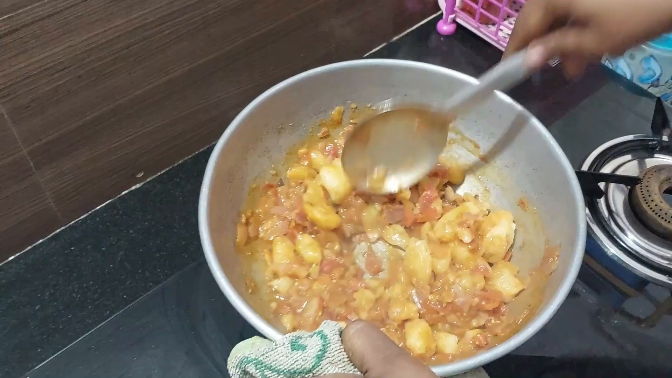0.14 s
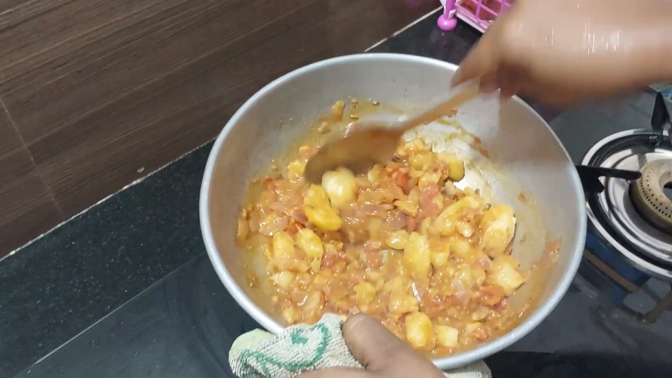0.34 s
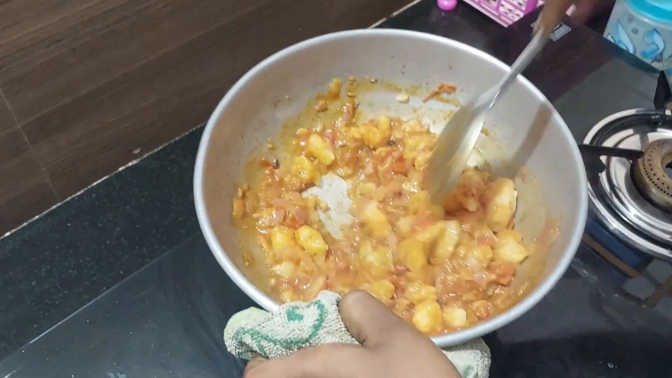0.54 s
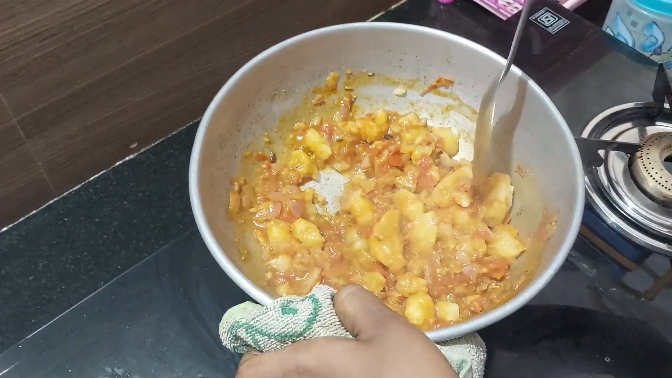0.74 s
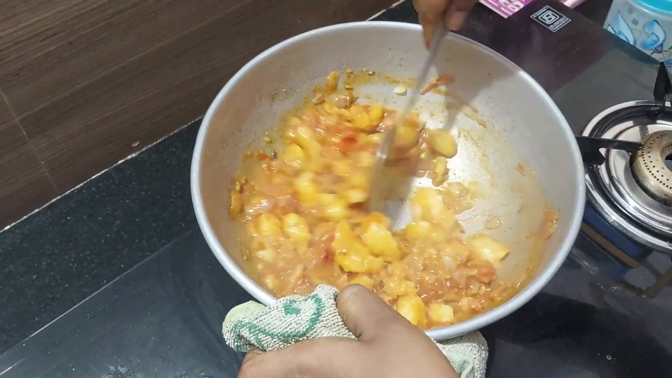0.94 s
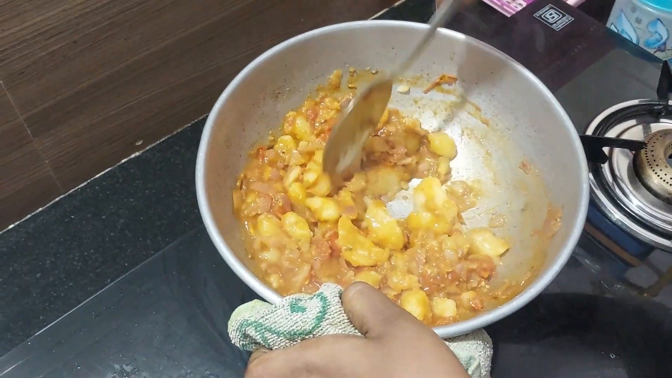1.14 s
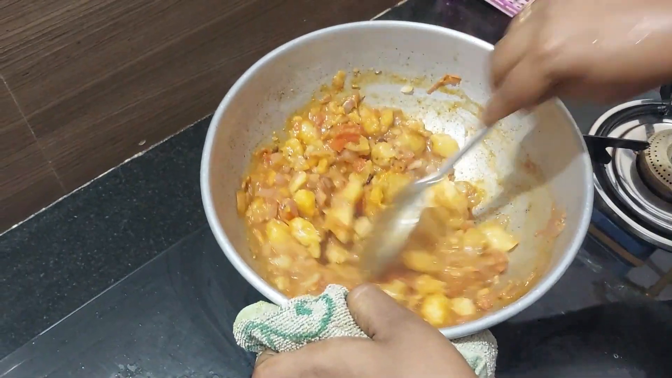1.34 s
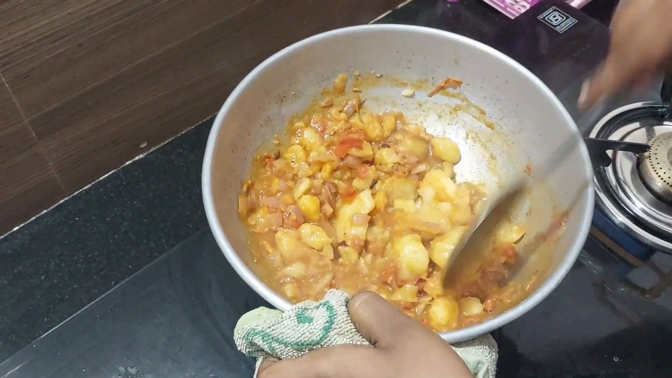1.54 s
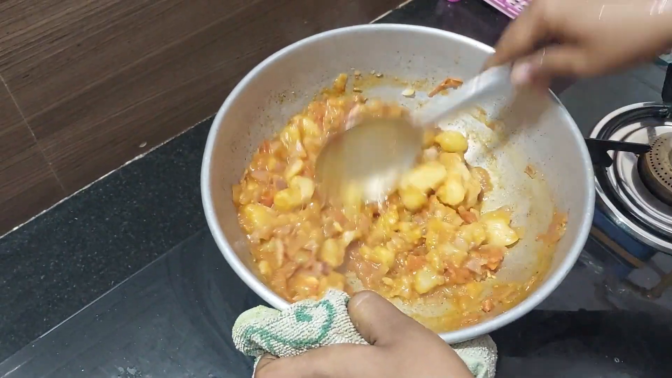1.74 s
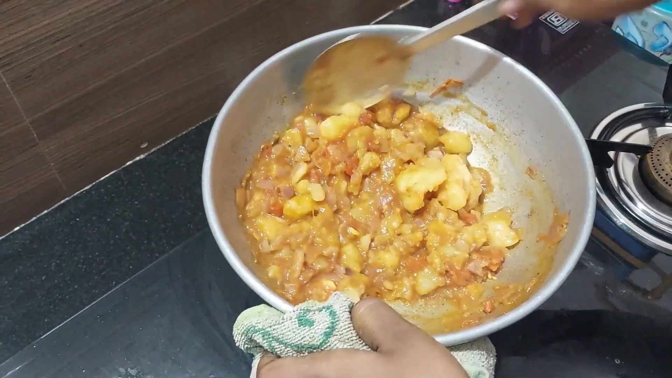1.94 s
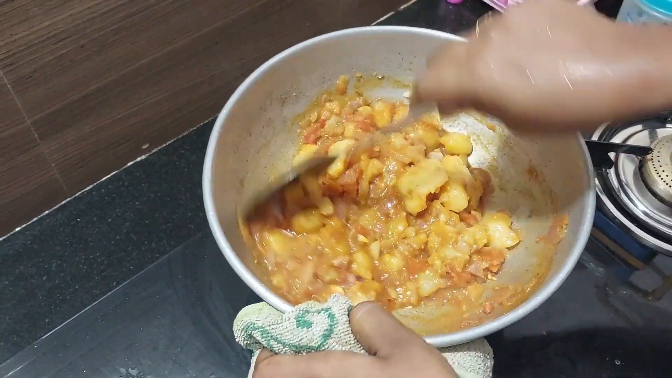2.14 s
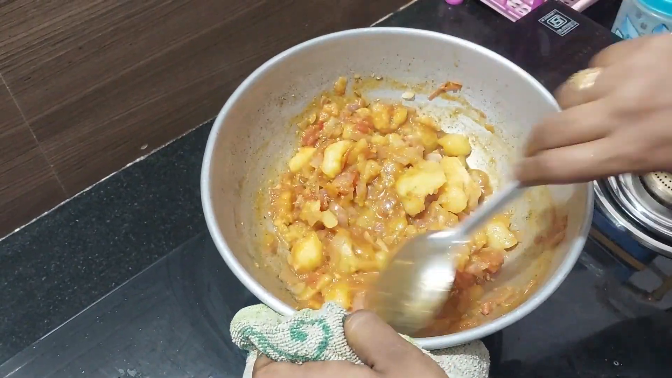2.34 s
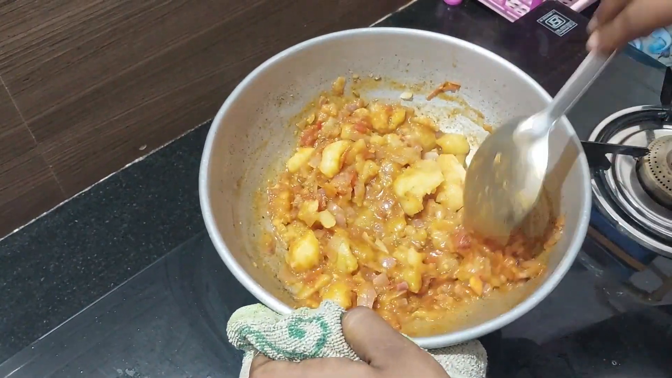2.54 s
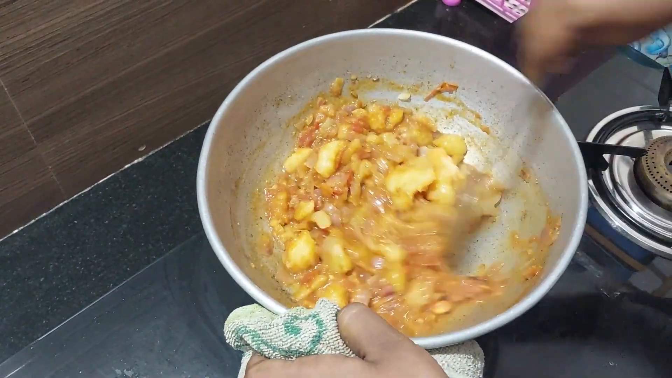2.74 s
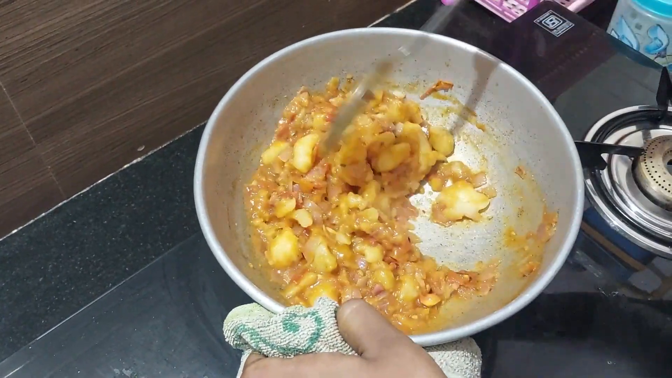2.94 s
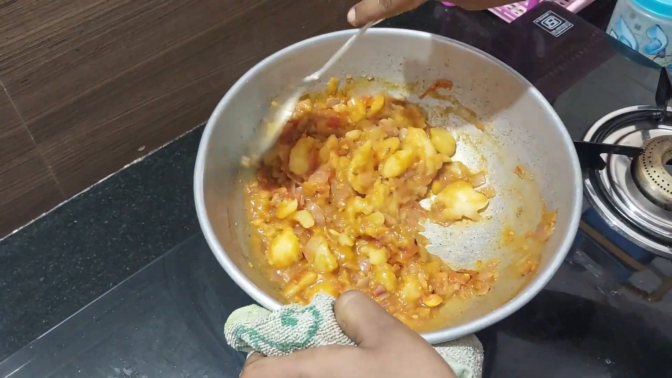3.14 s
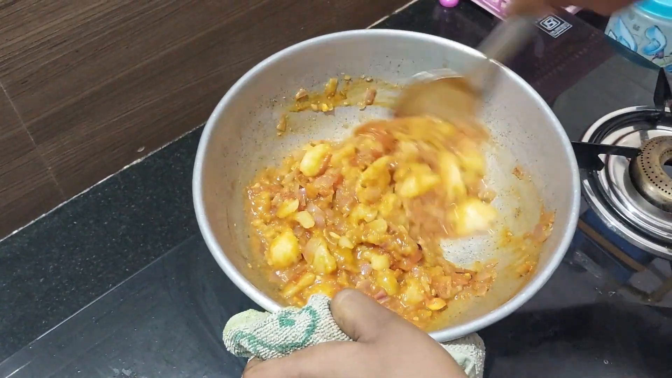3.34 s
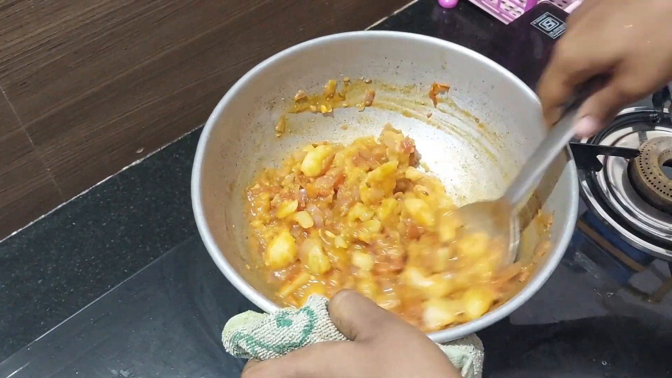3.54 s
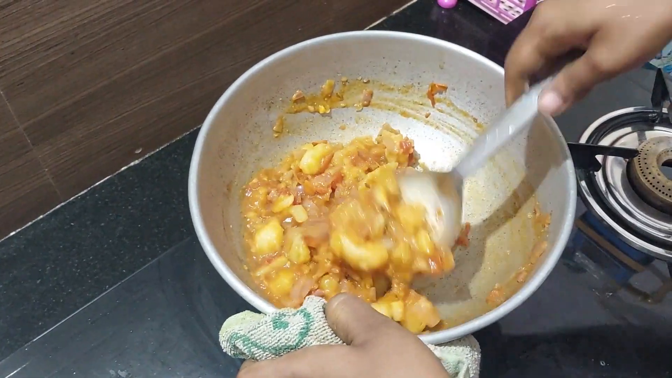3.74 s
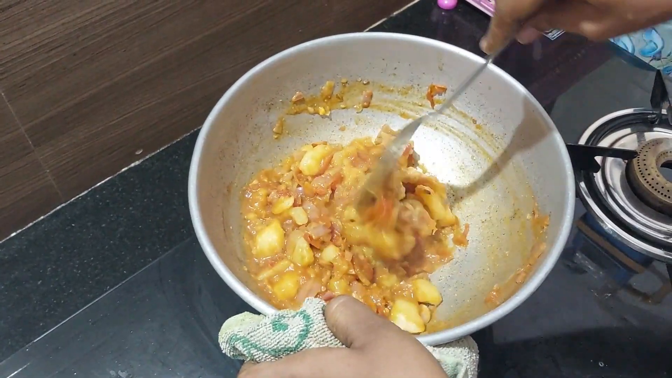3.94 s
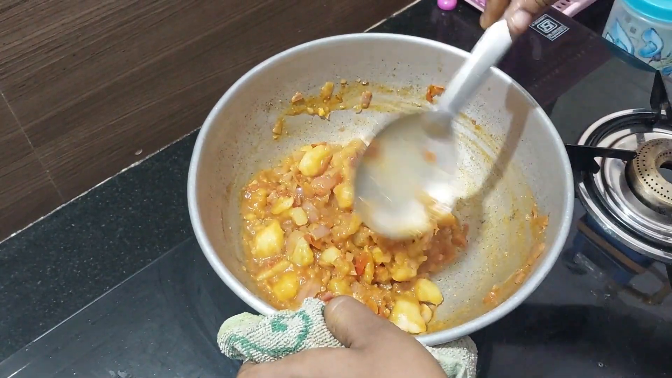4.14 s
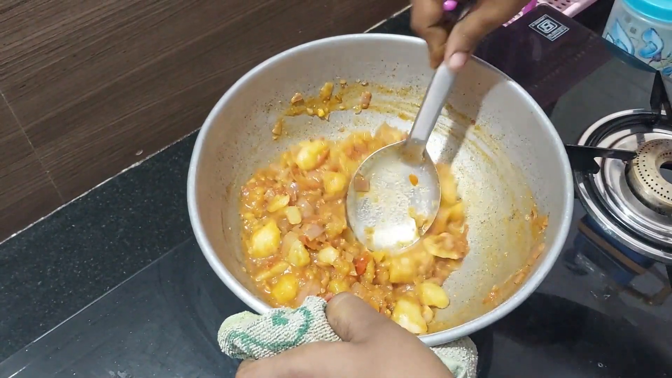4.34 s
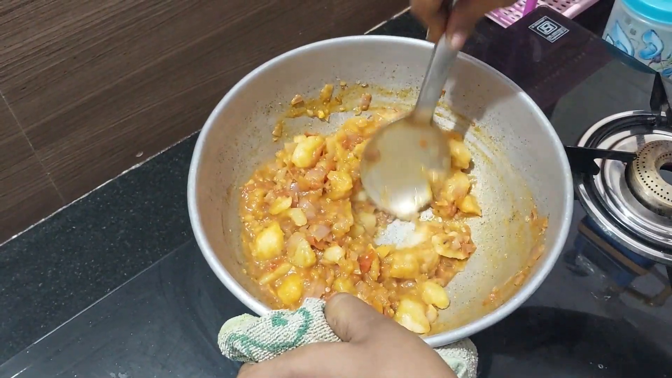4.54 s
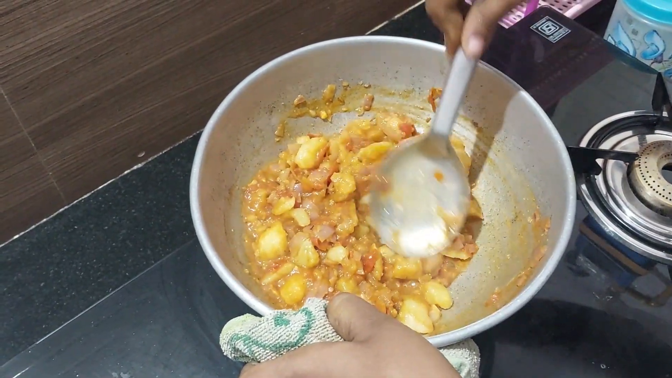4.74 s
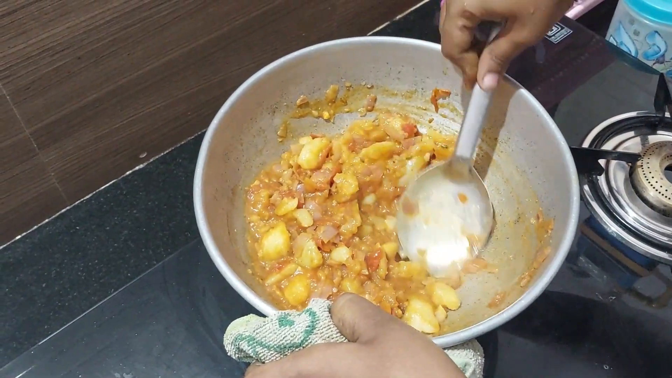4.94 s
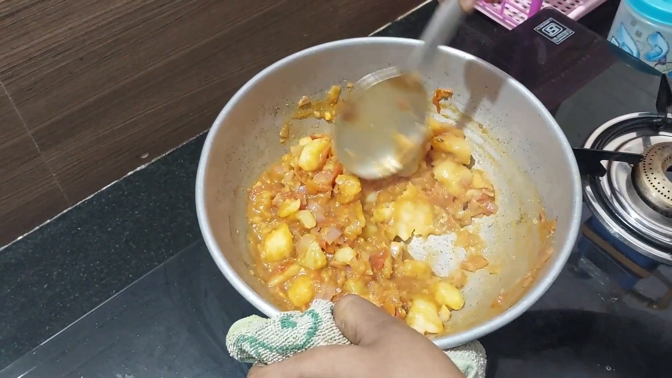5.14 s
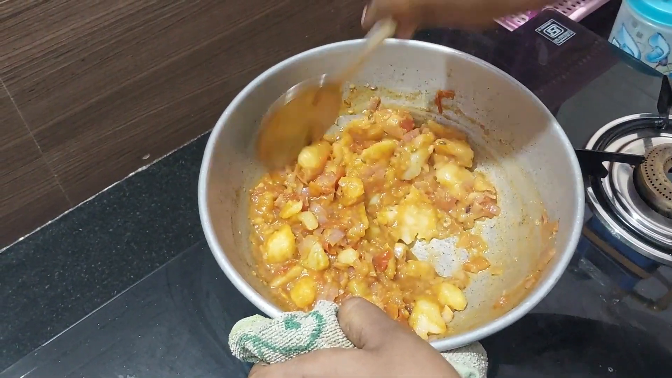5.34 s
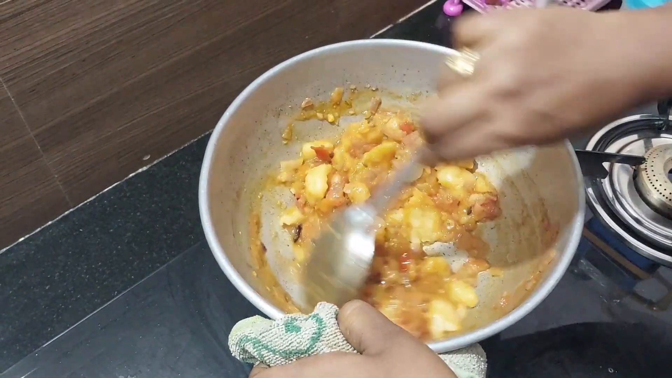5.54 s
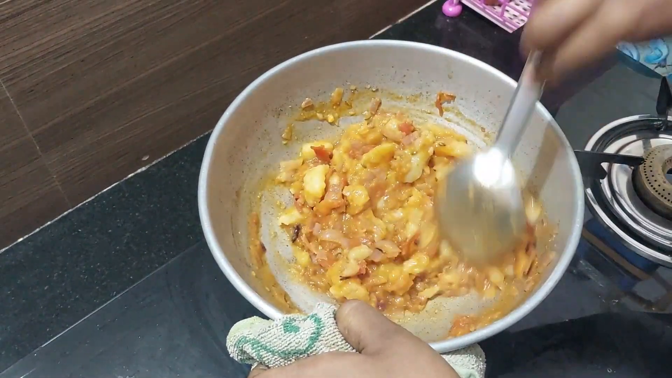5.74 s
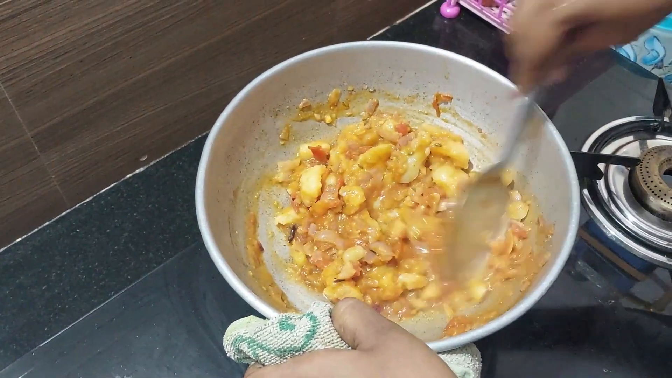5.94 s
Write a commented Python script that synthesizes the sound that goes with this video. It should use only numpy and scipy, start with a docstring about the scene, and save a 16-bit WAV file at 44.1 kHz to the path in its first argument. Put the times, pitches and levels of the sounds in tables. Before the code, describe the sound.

Thick gravy is stirred on a stove, with ringing spoon scrapes, dull knocks on the pan and quiet wet sizzling.

```python
"""Stirring gravy in a metal pan

A steel spoon stirs thick potato gravy on a stove. As it scrapes, it moves between ringing on the
pan's bare wall and chattering over the bottom; it knocks the pan, bare or cushioned by food.
The gravy squelches and sizzles, the hand-held pan rumbles on its support, and the hard-walled
kitchen rings on."""
import sys
import numpy as np
from scipy import signal
from scipy.fft import rfft, irfft, next_fast_len
from scipy.io import wavfile
from scipy.ndimage import map_coordinates

SR = 44100
rng = np.random.default_rng(int(sys.argv[2]) if len(sys.argv) > 2 else 0)


def int16_out(signal):
    """Quantize to a 16-bit WAV file."""
    q = np.round(np.clip(np.atleast_2d(signal).T, -1, 1) * 32767)
    wavfile.write(sys.argv[1], SR, q.astype(np.int16))


N = 268392


def amp(db):
    """Decibels to gain."""
    return 10 ** (np.asarray(db) / 20)


def unit(x):
    """Scale to rms 1."""
    return x / np.sqrt(np.mean(np.abs(x) ** 2) + 1e-20)


def along(points, hz):
    """Read (frequency, value) points on a log axis."""
    f, values = np.transpose(points)
    return np.interp(np.log(hz + 1), np.log(f), values)


def curves(rows):
    """Breakpoints to automation: one curve for each column after the time."""
    times, *columns = np.transpose(rows)
    return [np.interp(np.arange(N) / SR, times, column) for column in columns]


def wobble(rate):
    """A smooth random curve, rate knots a second."""
    return map_coordinates(rng.standard_normal(int(N * rate / SR) + 4), [np.arange(N) * rate / SR])


def filtered(x, response):
    """Pass x through a frequency response."""
    n = x.shape[-1]
    size = next_fast_len(n + SR // 8, real=True)
    return irfft(rfft(x, size) * response(np.fft.rfftfreq(size, 1 / SR)), size)[..., :n]


def coloured(x, spectrum):
    """Shape x with an EQ curve, at rms 1."""
    return unit(filtered(x, lambda hz: amp(along(spectrum, hz))))


def body(modes, f):
    """Causal response of a set of modes; each level sets that mode's total power."""
    return sum((-1) ** k * amp(db) / np.sqrt(width) * 1j * f * width / (hz * hz - f * f + 1j * f * width)
               for k, (hz, width, db) in enumerate(modes))


def band(f, centre_hz, q):
    """One broad causal resonance."""
    return 1 / (1 + 1j * q * (f / centre_hz - centre_hz / (f + .001)))


def slips(rate, spread_db):
    """Tiny impulses at random moments with scattered sizes, at rms 1."""
    size = amp(spread_db * np.clip(rng.standard_normal(N), -2, 2))
    return unit((rng.random(N) < rate / SR) * size * np.sign(rng.standard_normal(N)))


def burst(t60, response):
    """A dying cluster of contacts through a resonance, with the energy of 40 ms at rms 1."""
    t = np.arange(SR // 5) / SR
    hit = filtered(rng.standard_normal(len(t)) * amp(-60 * t / t60), response)
    return hit / np.linalg.norm(hit) * np.sqrt(.04 * SR)


def envelope(start, hold, attack_s=0.0071, sag_db_per_s=17, release_db_per_s=171):
    """A quick rise, a sagging hold and a release."""
    t = np.maximum(np.arange(N) / SR - start, 0)
    fall_db = sag_db_per_s * t + release_db_per_s * np.maximum(t - hold, 0)
    return np.minimum(t / attack_s, 1) * amp(-fall_db)


def add(track, start, sound):
    """Mix a sound in at start seconds."""
    part = track[round(start * SR):][:len(sound)]
    part += sound[:len(part)]


# Stereo width: (frequency [Hz], side minus mid [dB])
STEREO_WIDTH = [(60, -13), (250, -10), (500, -8.5), (1000, 0), (2000, 1.5), (4000, 0), (12000, 2.5)]
def spread(mid, side):
    """Left and right: the bass is nearly mono, the treble wide."""
    side = filtered(side, lambda hz: amp(along(STEREO_WIDTH, hz)))
    return np.array([mid + side, mid - side])


# Room tone EQ: (frequency [Hz], level [dB])
ROOM_TONE_EQ = [(15, -31.5), (25, -8), (117, 9), (200, -6), (285, 0.5), (373, -11.5), (531, -8.5),
                (1440, -20.5), (7310, -25.5), (8830, -36), (12200, -32.5), (16000, -48)]
def room_tone():
    """The steady bed of the kitchen and the burner."""
    return amp(-54) * spread(*coloured(rng.standard_normal((2, N)), ROOM_TONE_EQ))


# Reverb decay: (frequency [Hz], t60 [s])
KITCHEN_DECAY = [(150, 0.59), (500, 0.51), (1200, 0.46), (3000, 0.43), (7000, 0.36), (15000, 0.32)]
def kitchen(x):
    """The hard walls answer; their echo pattern keeps changing as the spoon moves."""
    echo, hop = np.zeros((2, N)), SR // 5
    padded = np.pad(x, (hop, 2 * hop))
    fade = np.sin(np.pi * np.arange(2 * hop) / (2 * hop))
    hz, t = np.fft.rfftfreq(256, 1 / SR), np.arange(0, SR // 2, 128) / SR
    mid_side_gain = np.array([np.ones(len(hz)), amp(along(STEREO_WIDTH, hz))])
    decay = amp(-60 * t / along(KITCHEN_DECAY, hz)[:, None]) * mid_side_gain[..., None]
    noise = signal.stft(rng.standard_normal((2, N + SR)), SR, nperseg=256)[2]
    for start in range(0, N + hop, hop):  # each overlapping slice gets its own random tail
        offset = rng.integers(noise.shape[-1] - len(t))
        mid, side = signal.istft(noise[..., offset:offset + len(t)] * decay, SR, nperseg=256)[1]
        tail = np.array([mid + side, mid - side]) / np.linalg.norm(mid)
        answer = signal.fftconvolve((fade * padded[start:start + 2 * hop])[None], tail, axes=1)
        for ear, part in zip(echo, answer):
            add(ear, max(start - hop, 0) / SR, part[max(hop - start, 0):])
    return echo


# Low modes of the pan on its support: (frequency [Hz], bandwidth [Hz], level [dB])
SUPPORT_MODES = [(70.2, 5.7, 2.5), (106.6, 8.8, -6.5), (127, 14, -3), (166, 6.8, -6), (241.4, 34, -1.5)]
def rumble(rise_s=0.038, drag_db=-33, drag_db_per_pressure_db=0.32):
    """The pan swings up on its support and settles after each knock, and is dragged by each stroke."""
    touching, pressure_db, *_ = stroke_controls()
    age = np.arange(SR // 2) / SR / rise_s
    swing = (age * np.exp(1 - age)) ** 2
    drag_power = touching * amp(drag_db + drag_db_per_pressure_db * pressure_db) ** 2
    power = np.abs(signal.fftconvolve(drag_power, swing / swing.sum())[:N])
    for start, *_, thud_db in KNOCK_CUES:
        add(power, start, amp(thud_db) ** 2 * swing)
    shake = filtered(rng.standard_normal((2, N)), lambda f: body(SUPPORT_MODES, f) * band(f, 110, q=0.27))
    return np.sqrt(power) * spread(*unit(shake))


# Puffs of steam: (time [s], hold [s], level [dB])
STEAM_CUES = [(0.352, 0.74, -58), (3.71, .17, -53.5), (4.017, 0.12, -56.5), (4.66, .17, -59.5)]
def steam(start_hz=6800, end_hz=4550, glide_s=.045, flutter_db=3):
    """Steam squeezes out under the food: a narrow hiss that falls as its gap opens unevenly."""
    track, t = np.zeros(N), np.arange(N) / SR
    turbulence = filtered(rng.standard_normal(N), lambda f: 1 / (1 + (f / 550) ** 2))
    turbulence *= amp(flutter_db * wobble(rate=60))
    for start, hold, db in STEAM_CUES:
        hz = end_hz + (start_hz - end_hz) * np.exp(-np.maximum(t - start, 0) / glide_s)
        hiss = unit(turbulence * np.sin(2 * np.pi * np.cumsum(hz) / SR))
        track += amp(db) * envelope(start, hold) * hiss
    return track


# EQs of the wet squelch and the bright sizzle: (frequency [Hz], level [dB])
SQUELCH_EQ = [(300, 6.5), (900, 3), (1500, -2.5), (2100, 12.5), (3500, 3.5), (5000, 2.5), (9000, -21)]
SIZZLE_EQ = [(2000, -3.5), (4500, 1.5), (6000, 6), (7500, 8), (8900, -2.5), (10500, 4), (12300, 8.5),
             (16000, -5.5)]
# The spoon folds gravy over: (time [s], hold [s], squelch [dB], sizzle [dB])
FOLD_CUES = [(-.02, 0.14, -52.5, -50), (.39, 0.11, -61, -51), (.49, 0.081, -51.5, -51.5),
             (.64, 0.18, -63.5, -55), (.86, 0.29, -58, -49.5), (1.32, 0.094, -61, -53),
             (1.44, 0.16, -71, -58), (1.655, 0.057, -53.5, -53.5), (1.725, 0.069, -45, -50.5),
             (2.654, 0.13, -49, -48), (2.81, .06, -49, -48), (2.988, 0.012, -47, -54.5),
             (3.84, 0.026, -57, -58.5), (4.32, 0.25, -49.5, -50), (4.54, 0.13, -46, -52.5),
             (4.88, .04, -55, -49.5), (4.923, 0.095, -44, -52.5), (5.024, 0.035, -38, -44),
             (5.955, 0.035, -71, -45)]
def gravy():
    """Each fold of the food squelches, and sizzles where it meets hot metal; in between it simmers."""
    squelch_gain, sizzle_gain = amp(-72), amp(-64.5)  # the simmer
    for start, hold, squelch_db, sizzle_db in FOLD_CUES:
        shape = envelope(start, hold)
        squelch_gain = np.maximum(squelch_gain, amp(squelch_db) * shape)
        sizzle_gain = np.maximum(sizzle_gain, amp(sizzle_db) * shape)
    squelch = coloured(slips(rate=500, spread_db=5), SQUELCH_EQ)
    sizzle = coloured(slips(rate=1100, spread_db=11.5), SIZZLE_EQ)
    return squelch_gain * squelch + sizzle_gain * sizzle


# Wet smacks and pops: (time [s], level [dB], centre [Hz], t60 [s])
SMACK_CUES = [(0.148, -50, 5560, 0.0036), (0.495, -49.5, 5300, 0.012), (0.51, -56, 4100, 0.014),
              (0.876, -52, 4370, 0.01), (0.96, -42.5, 3160, 0.0079), (1.197, -50.5, 6300, 0.0062),
              (1.318, -54.5, 5200, 0.004), (1.332, -50.5, 3230, 0.016), (1.837, -57, 5780, 0.0047),
              (1.872, -54.5, 6650, 0.0034), (2.073, -45.5, 7240, 0.0065), (2.821, -45, 3600, 0.016),
              (2.881, -59.5, 3130, 0.018), (3.645, -51.5, 6100, 0.0038), (3.759, -58, 5960, 0.0033),
              (4.001, -56.5, 6700, 0.0096), (4.047, -61.5, 11000, .003), (4.323, -52.5, 3950, 0.032),
              (4.387, -51.5, 5500, .012), (4.565, -44, 2035, .05), (4.949, -44.5, 3260, 0.012),
              (5.041, -44, 3200, 0.015), (5.064, -46, 2900, 0.017), (5.43, -58, 7000, 0.0044),
              (5.89, -57, 5760, 0.0056)]
def smacks():
    """Gravy tears off the spoon and bubbles burst."""
    track = np.zeros(N)
    for start, db, centre_hz, t60 in SMACK_CUES:
        add(track, start, amp(db) * burst(t60, lambda f: band(f, centre_hz, q=1.7) ** 2))
    return track


# Air pockets under the spoon's bowl: (time [s], level [dB], pitch [Hz])
GLUG_CUES = [(4.952, -17, 455), (4.983, -19, 426), (5.013, -32, 416), (5.042, -28, 420), (5.074, -48, 408)]
def glugs(t60=0.063, attack_s=.002):
    """Pressed into the gravy, the spoon traps air that rings with a hollow note."""
    track, t = np.zeros(N), np.arange(SR // 4) / SR
    shape = (1 - np.exp(-t / attack_s)) * amp(-60 * t / t60)
    for start, db, hz in GLUG_CUES:
        add(track, start, amp(db) * shape * np.sin(2 * np.pi * hz * t))
    return track


# Modes of the loaded pan: (frequency [Hz], bandwidth [Hz], level [dB])
PAN_MODES = [(229, 33, -10), (312.7, 17, -3), (412, 31, -2), (505.5, 59, -2.5), (623, 52, -2.5),
             (669, 90, -4), (824, 62, -6), (977, 56, -6), (1086, 213, -1.5), (1222, 139, -1.5),
             (1329, 82, -7), (1615, 200, -9), (2157, 130, -11), (2770, 170, -26), (3240, 84, -18.5)]
# Spoon hits on the pan: (time [s], level [dB], centre [Hz], contact t60 [s], support thud [dB])
KNOCK_CUES = [(0.262, -50, 560, 0.46, -51.5), (0.451, -41.5, 483, 0.075, -44), (0.5, -49, 690, 0.21, -42.5),
              (0.969, -25.5, 1020, .011, -34), (1.04, -31.5, 450, .06, -29.5), (1.33, -50, 950, 0.15, -58),
              (1.672, -36, 397, 0.029, -38), (1.693, -33, 560, 0.012, -39),
              (1.744, -31.5, 454, 0.06, -37.5), (2.049, -43, 307, 0.042, -40.5),
              (2.564, -34, 796, 0.18, -39.5), (2.637, -39.5, 900, .12, -52),
              (2.731, -31.5, 334, 0.057, -35.5), (2.757, -37, 202, 0.029, -39.5),
              (2.866, -32.5, 590, 0.045, -37), (2.907, -36, 410, 0.069, -56),
              (2.992, -33, 1050, 0.023, -40.5), (3.512, -33, 1250, .008, -58),
              (3.668, -40, 647, 0.074, -48), (3.835, -37, 890, 0.092, -46.5), (3.963, -45, 1000, .18, -62),
              (4.491, -46.5, 700, 0.11, -49), (4.542, -40, 670, 0.081, -44), (4.655, -35, 694, 0.0057, -48),
              (4.691, -54, 590, 0.066, -60), (4.953, -35.5, 274, 0.0087, -42),
              (5.013, -34.5, 227, 0.13, -46), (5.06, -32.5, 270, 0.13, -55), (5.097, -31.5, 730, .12, -37),
              (5.717, -53, 626, 0.13, -40), (5.787, -37.5, 755, 0.22, -54), (6.025, -48, 407, .044, -42.5)]
def knocks(damping=1.17):
    """Blows through food: it damps the pan, and the softer the cushion, the lower the modes that answer."""
    track = np.zeros(N)
    damped = [(hz, width_hz * damping, db) for hz, width_hz, db in PAN_MODES]
    for start, db, centre_hz, t60, _ in KNOCK_CUES:
        hit = burst(t60, lambda f: body(damped, f) * band(f, centre_hz, q=0.47) ** 2)
        add(track, start, amp(db) * hit)
    return track


def pan_chatter(drive, centre_hz, octaves):
    """Stick-slip shakes the pan's modes; each stroke chatters around its own centre pitch."""
    hz, t, spectrum = signal.stft(filtered(drive, lambda f: body(PAN_MODES, f)), SR, nperseg=512)
    centre = np.interp(t, np.arange(N) / SR, centre_hz)
    focus = np.exp(-.5 * (np.log2((hz[:, None] + 1) / centre) / octaves) ** 2)
    focus /= np.linalg.norm(focus * np.abs(body(PAN_MODES, hz))[:, None], axis=0)  # even power
    return unit(signal.istft(spectrum * focus, SR, nperseg=512)[1][:N])


# Modes of the spoon: (frequency [Hz], bandwidth [Hz], level on its tip [dB], level on its side [dB])
SPOON_MODES = [(319, 86, -10.5, 1), (456, 93, 3.5, -19), (918, 12, -31, 3.5), (984, 21, -13, 3),
               (1141, 71, -5, -2), (1270, 110, 4.5, -20), (1677, 23, -12.5, -22), (1985, 70, -18, 0.5),
               (2414, 117, -1, 5.5), (2870, 84, -3.5, -6), (3030, 110, -7, -2), (3440, 230, -18, 0),
               (3820, 44, 7, -12), (4270, 700, -6, 3.5), (5610, 270, 0.5, -4), (6100, 66, -17, -20),
               (7430, 97, -3.5, -24.5), (12150, 840, 1, -10)]
def spoon_ring(drive, touching, depth, drift, roll_depth=0.61):
    """The spoon rolls between tip and side; the angle picks its modes, which wander as it slides."""
    ring = np.zeros(N)
    side = np.clip(depth[touching] / roll_depth, 0, 1)
    slide = wobble(rate=6)[touching], wobble(rate=8.5)[touching]
    for k, (hz, width_hz, tip_db, side_db) in enumerate(SPOON_MODES):
        carrier = np.exp(2j * np.pi * np.cumsum(hz + drift * width_hz * slide[k % 2]) / SR)
        pole = np.exp(-np.pi * width_hz / SR)
        mode = (carrier * signal.lfilter([1], [1, -pole], drive[touching] / carrier)).real
        ring[touching] += amp((1 - side) * tip_db + side * side_db) * unit(mode)
    return ring / np.std(ring[touching])


# EQ of metal contact, for cracks and grit: (frequency [Hz], level [dB])
CONTACT_EQ = [(300, -12), (1500, 4), (2800, 1.5), (4400, -3.5), (5300, 4.5), (6300, 5), (7600, 11.5),
              (8200, 2), (8800, -4.5), (10300, 0), (12000, 0), (16000, -10)]
# Ring of the pan's rim: (frequency [Hz], level [dB], t60 [s])
RIM_MODES = [(982, -7.5, 0.73), (2080, -6, .5)]
# Bare spoon on bare pan: (time [s], spoon [dB], crack [dB], rim [dB], angle [0 tip to 1 side])
CLANG_CUES = [(0.9725, -23.5, -35, -28.5, 0.98), (3.191, -28, -24.5, -48, 0.3),
              (5.475, -48, -57, -66, 0.02)]
def clangs():
    """Metal on metal: a crack, all the spoon's modes at once, and the rim singing on."""
    track, t = np.zeros(N), np.arange(SR) / SR
    rim = sum(amp(db - 60 * t / t60) * np.sin(2 * np.pi * hz * t) for hz, db, t60 in RIM_MODES)
    for start, spoon_db, crack_db, rim_db, side in CLANG_CUES:
        modes = [(hz, width_hz, (1 - side) * tip_db + side * side_db)
                 for hz, width_hz, tip_db, side_db in SPOON_MODES]
        add(track, start, amp(spoon_db) * burst(0.018, lambda f: body(modes, f)))
        add(track, start, amp(crack_db) * burst(0.014, lambda f: amp(along(CONTACT_EQ, f))))
        add(track, start, amp(rim_db) * rim)
    return track


# Scraping strokes: (chatter centre [Hz], chatter [dB], spoon ring [dB], path)
# Path points: (time [s], pressure [dB], depth [0 tip on the bare wall to 1 side on the bottom])
STROKE_CUES = [ (740, 2, 3, [(.972, -34, 0.85), (1.0, -28, 0.58), (1.035, -39.5, 0.75), (1.09, -61.5, 0.25),
               (1.13, -63, 0.48)]), (1146, -5.5, 4.5, [(2.08, -41, 0), (2.125, -28.5, 0.11),
               (2.172, -22.5, 0), (2.26, -28, 1), (2.335, -17, 0.82), (2.395, -16.5, 1), (2.435, -24, 0.79),
               (2.475, -17.5, 0.82), (2.545, -48.5, 0.94)]), (1200, -3, 11.5, [(3.191, -33, 0.16),
               (3.255, -36, 0.43), (3.295, -47.5, 0.19), (3.343, -29, 0.4), (3.37, -30, 0.65),
               (3.407, -30.5, 0.51), (3.425, -75, 0.91)]), (903, -3.5, 3, [(3.515, -57, .4),
               (3.53, -33.5, 0.23), (3.58, -46.5, 0.97), (3.63, -66.5, 1)]),
               (662, 5.5, 7, [(5.473, -48.5, 0.2), (5.503, -37, 0.24), (5.545, -32.5, 0.63),
               (5.578, -25.5, 0.017), (5.59, -33.5, 1), (5.615, -33, 0.96), (5.634, -36, 0.96),
               (5.65, -24.5, 0.62), (5.695, -67, 0.65)])]
def stroke_controls():
    """The spoon's automation: contact gate, pressure, depth, chatter centre, chatter and ring levels."""
    t = np.arange(N) / SR
    touching = np.any([(t >= path[0][0]) & (t <= path[-1][0]) for *_, path in STROKE_CUES], axis=0)
    return touching, *curves([(*point, *voice) for *voice, path in STROKE_CUES for point in path])


def scrapes(wall_db=-17, bottom_db=13, buried_db=34.5):
    """The edge grips and slips, grinding grit: on the wall it rings the spoon, deeper it shakes the pan."""
    touching, pressure_db, depth, centre_hz, chatter_db, ring_db = stroke_controls()
    pressure, depth = touching * amp(pressure_db), np.clip(depth, 0, 1)
    grip = amp(4.56 * wobble(rate=110))
    fine = grip * slips(rate=3500, spread_db=0.5)
    coarse = grip * slips(rate=600, spread_db=1.0)
    ring_gain = amp(ring_db - buried_db * depth ** 3)  # deep in the food, the spoon is muted
    ring = ring_gain * spoon_ring(fine, touching, depth, drift=0.3)
    chatter_gain = amp(chatter_db + wall_db * (1 - depth) + bottom_db * depth)
    chatter = chatter_gain * pan_chatter(coarse, centre_hz, octaves=0.92)
    grit = coloured(fine * amp(4.54 * wobble(rate=400)), CONTACT_EQ)
    return pressure * (ring + chatter + grit)


def scene():
    """Metal and food are heard directly and through the room, over the rumble and the room tone."""
    metal = scrapes() + clangs()
    cushioned = knocks() + glugs()
    food = gravy() + steam()
    pops = smacks()
    direct = amp(-8.5) * metal + amp(-10.5) * cushioned + amp(-5.5) * food + amp(-2) * pops
    send = amp(-2.43) * metal + amp(-4.5) * cushioned + amp(-6.5) * food + amp(-3) * pops
    return direct + kitchen(send) + rumble() + room_tone()


# Balance of the microphones: (frequency [Hz], left minus right [dB])
MIC_BALANCE = [(60, 5.5), (200, -3), (550, 0.5), (1000, 1), (2000, -6), (4000, -5), (8000, -0.5),
               (14000, 3)]
def record(dry):
    """Two slightly unlike microphones, the left one nearer; low cut, full-scale clipping and high cut."""
    left_lead_s, low_cut_hz, high_cut_hz = .00013, 42, 16000

    def microphones(hz):
        balance = amp(np.outer([.5, -.5], along(MIC_BALANCE, hz)))
        delay = np.exp(1j * np.pi * left_lead_s * np.outer([1, -1], hz))
        low_cut = hz ** 2 / np.hypot(hz ** 2, low_cut_hz ** 2)
        return balance * delay * low_cut

    clipped = np.clip(filtered(dry, microphones), -1, 1)
    return filtered(clipped, lambda hz: hz < high_cut_hz)


dry = scene()
out = record(dry)
int16_out(out)
```